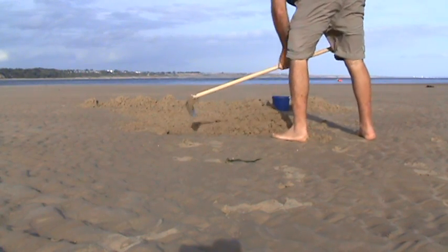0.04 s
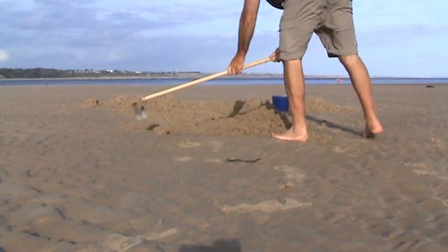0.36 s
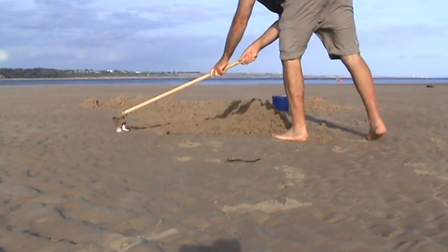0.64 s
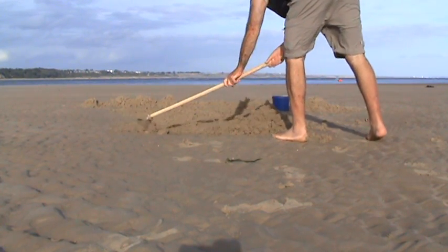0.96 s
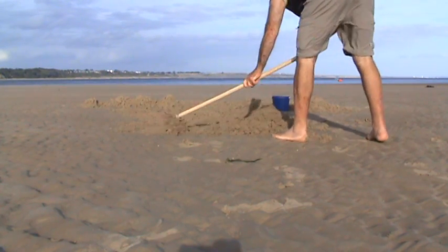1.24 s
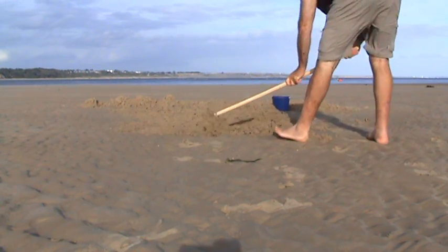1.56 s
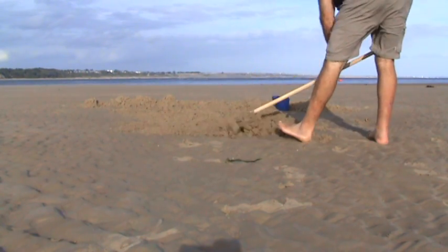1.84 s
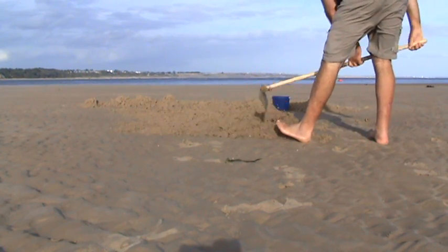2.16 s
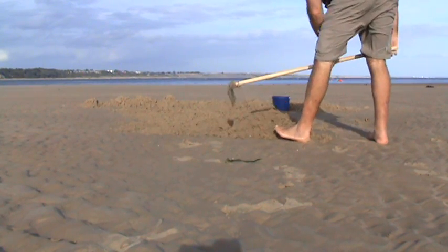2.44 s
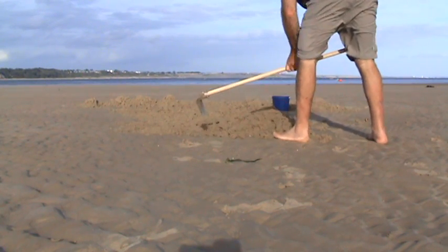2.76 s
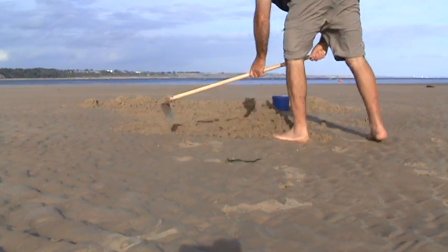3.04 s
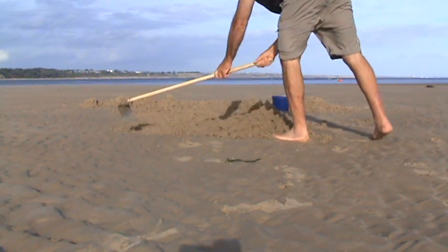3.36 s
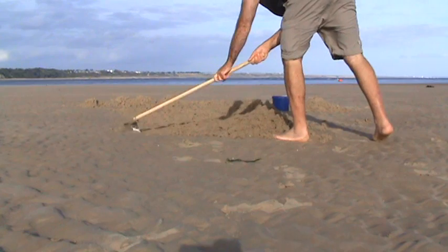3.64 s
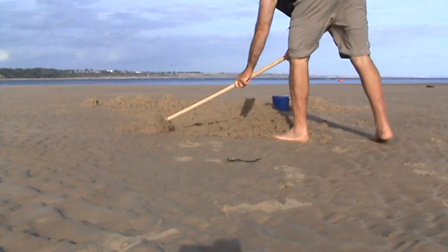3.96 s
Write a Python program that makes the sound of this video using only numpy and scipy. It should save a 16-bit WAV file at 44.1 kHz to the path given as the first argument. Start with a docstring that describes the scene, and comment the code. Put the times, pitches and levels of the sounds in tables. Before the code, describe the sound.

Wind rumbles and thumps on the microphone over two quieter rake strokes in sand.

```python
"""A rake is pulled twice through wet beach sand, a few metres away: its head lands with a scuff,
then the tines scrape through the grains, rasp where they bite and tick on bits of shell.
Gusty wind buffets the microphone's two ports, a lumpy rumble that turns to a rough flutter as it
stiffens; its eddies thump, spit and snap. A faint even hiss lies under it all."""
import sys
import numpy as np
from scipy import signal
from scipy.fft import rfft, irfft
from scipy.io import wavfile

SR = 44100
rng = np.random.default_rng(int(sys.argv[2]) if len(sys.argv) > 2 else 0)


def materialize(psi):
    """Save the field psi as 16-bit PCM at rate SR to the path in sys.argv[1].

    A 1-D psi becomes a single channel; in a 2-D psi each row is a channel.
    """
    bounded = np.clip(np.atleast_2d(psi).T, -1, 1)
    quanta = np.round(bounded * 32767).astype(np.int16)
    wavfile.write(sys.argv[1], SR, quanta)


N = 176400
TIME = np.arange(N) / SR
BINS = np.arange(N // 2 + 1) * SR / N


def from_db(db):
    """Decibels to gain."""
    return 10 ** (np.asarray(db) / 20)


def rms_one(x):
    """Scale to unit power."""
    return x / np.sqrt(np.mean(x ** 2) + 1e-20)


def at_hz(points, hz):
    """Read a table on a log-frequency axis."""
    f, v = np.transpose(points)
    return np.interp(np.log(np.maximum(hz, 1)), np.log(f), v)


def in_time(points, **ends):
    """Read an envelope at every sample."""
    return np.interp(TIME, *np.transpose(points), **ends)


def swell(s, length):
    """A smooth rise and fall centred on s; length is its width at half height."""
    return np.cos(np.pi / 2 * np.clip((TIME - s) / length, -1, 1)) ** 2


def eq_curve(spectrum):
    """An EQ of unit power, so only its shape counts; it rolls off below the first point."""
    return rms_one(from_db(at_hz(spectrum, BINS)) * np.minimum(BINS / spectrum[0][0], 1) ** 2)


def coloured(x, spectrum):
    """EQ a white signal, keeping its power."""
    return irfft(rfft(x) * eq_curve(spectrum), N)


def drift(rate_hz):
    """Smooth random modulation with spread 1."""
    noise = rfft(rng.standard_normal(N))
    return rms_one(irfft(noise * (BINS > 2) / (1 + (BINS / rate_hz) ** 2), N))


def cracks(per_s, spread_db):
    """Random tiny impulses of uneven size."""
    born = rng.random(N) < per_s / SR
    signs = rng.choice([-1, 1], N)
    return rms_one(born * signs * from_db(spread_db * np.minimum(rng.exponential(1, N), 5)))


def resonance(x, hz, width):
    """One resonance that keeps the power of a white signal."""
    return np.sqrt(SR / np.pi / width) * signal.lfilter(*signal.iirpeak(hz, hz / width, fs=SR), x + 1e-18)


def gliding_resonance(x, hz, width):
    """A resonance whose centre moves; it keeps the power of a white signal."""
    turn = np.exp(2j * np.pi * np.cumsum(hz) / SR)
    r = np.exp(-np.pi * width / SR)
    return np.real(turn * signal.lfilter([np.sqrt(2 * (1 - r * r))], [1, -r], x / turn + 1e-18))


def stereo(mid, side, pan_db):
    """Left and right from mid and side; a positive pan leans left."""
    return np.array([(mid + side) * from_db(pan_db / 2), (mid - side) * from_db(-pan_db / 2)])


# EQ of the noise bed: f/Hz, level/dB
HISS_EQ = [(500, 17.5), (2000, 8), (5000, 6), (8000, -0.5), (12000, -2), (15500, -7.5)]
def hiss(level_db=-67.5, side_db=-6):
    """A faint, steady bed of noise."""
    mid, side = from_db(level_db) * coloured(rng.standard_normal((2, N)), HISS_EQ)
    return stereo(mid, from_db(side_db) * side, 0)


# gust envelope: t/s, level/dB
GUST_ENVELOPE = [(0.0, -32), (0.06, -44), (0.14, -38), (0.29, -31.5), (0.46, -34), (0.58, -34.5),
                 (0.74, -31), (0.86, -35), (0.9, -35.5), (1.0, -36), (1.22, -43.5), (1.28, -37.5),
                 (1.52, -47.5), (1.66, -41), (1.72, -37.5), (1.79, -39.5), (1.89, -37.5), (1.95, -35),
                 (2.18, -39), (2.3, -34.5), (2.34, -38), (2.44, -32.5), (2.6, -30), (2.66, -38),
                 (2.78, -43), (2.88, -35.5), (2.93, -34), (2.96, -28), (3.2, -31.5), (3.52, -43.5),
                 (3.57, -36.5), (3.68, -28), (3.84, -30.5), (3.98, -29)]
# low rumble envelope: t/s, level/dB
RUMBLE_ENVELOPE = [(0.0, -24), (0.14, -17.5), (0.44, -17), (0.56, -21.5), (0.64, -20), (0.96, -18),
                   (1.02, -18.5), (1.16, -22), (1.22, -28), (1.27, -20), (1.34, -17.5), (1.38, -25),
                   (1.43, -20), (1.5, -32), (1.65, -19.5), (1.73, -13.5), (1.8, -19), (1.9, -19),
                   (2.14, -18), (2.32, -20), (2.42, -15), (2.6, -15.5), (2.68, -23.5), (2.72, -19.5),
                   (2.76, -20.5), (3.1, -19), (3.4, -20.5), (3.5, -23), (3.74, -14.5), (3.98, -14.5)]
# hard buffets: t/s, length/s, boost of the low body/dB, boost of the crackling edge/dB
BUFFET_HITS = [(0.105, 0.011, 9, 11.5), (0.141, 0.013, 9.5, 8), (0.176, 0.0074, 13, 9.5),
               (0.222, 0.011, 7.5, 0), (0.251, 0.022, 2, 5), (0.28, 0.022, 0.5, 2.5),
               (0.334, 0.011, -3, 11), (0.449, 0.012, 0, 7), (0.465, .007, -2, 5.5),
               (0.519, 0.0053, -5, 5.5), (0.611, 0.0086, 3, -4.5), (0.801, 0.0073, -0.5, -2),
               (0.861, 0.015, 6.5, 10), (0.948, 0.0039, 0.5, 6.5), (0.996, 0.0093, 9.5, 8.5),
               (1.027, .008, 7, 12.5), (1.077, 0.01, 10, 9.5), (1.178, 0.011, 9.5, 2.5),
               (1.262, 0.011, 6.5, 13), (1.291, 0.0068, 6, -0.5), (1.327, 0.016, 6.5, 3),
               (1.463, 0.0074, 15, 5.5), (1.52, .007, 14, -6), (1.592, .008, 8.5, 4),
               (1.693, 0.0065, 8, 14.5), (1.723, .012, 2, 12.5), (1.751, 0.0074, 6, 9.5),
               (1.795, 0.011, 6, 6), (1.819, .009, 7.5, 16.5), (1.875, 0.0092, 9.5, 6.5),
               (1.898, .008, -6.5, 13), (1.942, 0.013, 10, 8), (1.973, 0.0063, 0.5, 6),
               (2.065, 0.015, 6, 9.5), (2.122, 0.0055, -0.5, 7.5), (2.14, 0.012, 6, 7.5),
               (2.166, 0.0069, 10, 0), (2.222, 0.005, 7.5, 4.5), (2.289, 0.015, 8, 8),
               (2.375, 0.011, 11.5, 6.5), (2.413, 0.0096, 8.5, 3.5), (2.449, 0.015, 9, 11.5),
               (2.523, 0.026, 5, 5.5), (2.59, 0.016, 5.5, 3), (2.635, 0.006, 9, 9),
               (2.736, 0.0069, 17.5, 15.5), (2.844, 0.01, 6.5, 6), (2.904, 0.0057, 12, 0),
               (3.035, .01, 1, -1.5), (3.186, 0.0079, 3, 5.5), (3.237, 0.013, 7, 4.5), (3.437, 0.011, 6, 3),
               (3.555, 0.014, 6.5, 8.5), (3.64, 0.0048, 4, 6), (3.7, 0.011, 4, 2)]
def wind_force():
    """The wind's push in dB: gust and rumble about their means, and the buffets' body and edge."""
    gust, rumble = in_time(GUST_ENVELOPE), in_time(RUMBLE_ENVELOPE)
    body, edge = sum(np.outer(boosts_db, swell(s, length)) for s, length, *boosts_db in BUFFET_HITS)
    return gust - gust.mean(), rumble - rumble.mean(), body, edge


# base EQ of the wind: f/Hz, level/dB
RUSH_EQ = [(22, -11), (50, -1.5), (100, -1), (200, -7), (330, -13.5), (600, -27), (1200, -37.5),
           (2200, -46), (3300, -54.5), (3900, -64), (4700, -68), (6000, -85), (9000, -97.5)]
# how far a band rides the gusts: f/Hz, dB per dB of gust
GUST_DEPTH = [(100, 1.6), (300, 1.01), (1000, 0.79), (3000, 1.17), (5000, 2.5)]
# how much a band rides the rumble instead: f/Hz, share
RUMBLE_BLEND = [(90, 1.0), (180, 0.69), (360, 0), (720, 0)]
# how far a band rides a buffet: f/Hz, dB per dB of body, dB per dB of edge
BUFFET_DEPTH = [(91.4, 0.2, 0), (183, 0.78, 0), (360, 0.78, 0.043), (720, 0.59, 0.26), (1440, 0.2, 0.55),
                (2900, 0, 1.14), (5000, 0.31, 1.7)]
# flutter from fast turbulence: f/Hz, depth/dB
FLUTTER_DEPTH = [(60, -0.5), (300, 2.56), (1000, 2.5), (3000, 3.5), (5000, 7)]
def rush(gust, rumble, body, edge, level_db=-21):
    """Turbulent pressure on the ports: each octave of noise surges and flutters by its own amount."""
    eddies = drift(rate_hz=140) + 0.77 * drift(rate_hz=43)
    eddies = 2 * np.tanh(eddies / 2)  # soften the wildest swings
    white = rng.standard_normal((2, N))
    depths = np.array(BUFFET_DEPTH)
    octaves = 45 * 2 ** np.arange(8)
    spectrum = 0
    for hz in octaves:
        deep = np.clip(at_hz(RUMBLE_BLEND, hz), 0, 1)
        buffet_db = at_hz(depths[:, :2], hz) * body + at_hz(depths[:, ::2], hz) * edge
        force_db = deep * rumble + (1 - deep) * at_hz(GUST_DEPTH, hz) * gust + buffet_db
        flutter = rms_one(from_db(at_hz(FLUTTER_DEPTH, hz) * eddies))
        band = np.interp(BINS, octaves, octaves == hz)
        spectrum = spectrum + rfft(white * from_db(force_db) * flutter) * band
    return from_db(level_db) * irfft(spectrum * eq_curve(RUSH_EQ), N)


# EQ of the wind's crackle: f/Hz, level/dB
SPIT_EQ = [(200, 9), (600, 16.5), (1500, -2), (3500, -11.5), (4600, -25), (6500, -46), (10000, -60.5)]
def spits(gust, edge, level_db=-45.5, gust_depth=1.18):
    """Eddies break on the ports and spit, louder in gusts and buffets."""
    crackle = np.array([cracks(per_s=170, spread_db=2.5) for _ in range(2)])
    return coloured(crackle * from_db(level_db + gust_depth * gust + edge), SPIT_EQ)


# snap cues: t/s, level/dB before gain and EQ
SNAP_HITS = [(0.141, -34.5), (0.178, -39), (0.292, -22.5), (0.334, -26.5), (2.444, -28), (2.447, -24.5),
             (2.454, -29), (2.462, -28), (2.51, -28), (2.523, -30.5), (2.532, -26.5), (2.591, -33.5),
             (2.733, -29), (2.736, -38.5), (2.997, -36.5)]
# EQ of a snap: f/Hz, level/dB
SNAP_EQ = [(400, 15), (1500, -4), (3500, 0), (5500, -13), (7000, -28), (10000, -52)]
def snaps(gain_db=6.5):
    """Single sharp pressure kicks from the hardest eddies, breaking right on a port."""
    kicks = np.zeros((2, N))
    for s, db in SNAP_HITS:
        kicks[:, int(s * SR)] = from_db(gain_db + db) * rng.choice([-1, 1], 2)
    return coloured(kicks, SNAP_EQ)


# low thump cues: t/s, level/dB
THUMP_HITS = [(0.149, -11), (0.224, -13), (0.432, -13), (0.495, -11.5), (0.621, -11), (0.986, -10),
              (1.183, -10), (1.266, -15), (1.464, -19), (1.692, -9), (1.869, -11.5), (1.947, -9.5),
              (2.077, -15.5), (2.164, -13.5), (2.415, -9), (2.905, -13.5), (3.223, -13), (3.302, -16.5),
              (3.445, -10)]
def thumps(hz=90.5, length_s=0.011):
    """A large eddy pushes and pulls once on the ports."""
    phases = 2 * np.pi * rng.random((len(THUMP_HITS), 2, 1))
    return sum(from_db(db) * swell(s, length_s) * np.sin(2 * np.pi * hz * (TIME - s) + phase)
               for (s, db), phase in zip(THUMP_HITS, phases))


# colour of the ports' small cavity: f/Hz, gain/dB
CAVITY_EQ = [(2800, 0), (3300, -1), (3700, 1), (4200, -0.5), (4700, -4), (6000, -5)]
# stereo width of the wind: f/Hz, side over mid/dB
PORT_WIDTH = [(35, -8.5), (85, -6.5), (170, 1), (350, 8), (700, 8.5), (1400, 6.5), (2800, 2.5), (5000, 0.5)]
# part of the side a quarter cycle ahead of the mid: f/Hz, share (negative lags)
SIDE_LEAD = [(45, -1.1), (100, -0.43), (200, 1), (400, 0.31), (800, 0.4), (1500, .55), (3000, 0.86)]
# pan of the wind: f/Hz, left over right/dB
PORT_PAN = [(35, 0.7), (170, -2.15), (600, 0.5), (1400, 0), (3000, -1.5), (5000, -2)]
def ports(pair):
    """Two unrelated pressures become the mid and side of the microphone's close ports."""
    mid, unrelated = rfft(pair) * from_db(at_hz(CAVITY_EQ, BINS))
    lead = np.clip(at_hz(SIDE_LEAD, BINS), -.95, .95)
    side = from_db(at_hz(PORT_WIDTH, BINS)) * (1j * lead * mid + np.sqrt(1 - lead ** 2) * unrelated)
    return irfft(stereo(mid, side, at_hz(PORT_PAN, BINS)), N)


def wind():
    """All the wind layers, heard through the ports they strike."""
    gust, rumble, body, edge = wind_force()
    return ports(rush(gust, rumble, body, edge) + spits(gust, edge) + snaps() + thumps())


def grit():
    """Sand grains cracking past each other."""
    return cracks(per_s=8000, spread_db=1.9)


def stick_slip(depth_db=1.5):
    """The level judders as the tines stick and slip."""
    return from_db(depth_db * drift(rate_hz=45))


# scuff cues: t/s, length/s, level/dB
SCUFF_HITS = [(0.25, 0.082, -68), (0.568, 0.12, -70.5), (0.613, 0.025, -57.5), (2.247, 0.028, -67),
              (3.302, .14, -72.5), (3.589, 0.035, -62), (3.603, 0.014, -60), (3.804, .03, -60),
              (3.848, .04, -59)]
# EQ of spraying sand: f/Hz, level/dB
SCUFF_EQ = [(1500, -10.5), (4500, 6.5), (9000, 3), (12000, -0.5), (15500, -12.5)]
def scuffs():
    """Brief bright sprays of grains, as when the rake head lands."""
    envelope = sum(from_db(db) * swell(s, length) for s, length, db in SCUFF_HITS)
    return coloured(grit() * envelope, SCUFF_EQ)


# tick cues: t/s, burst level/dB, ring f/Hz, ring width/Hz
TICK_HITS = [(1.065, -45, 6200, 900), (1.097, -45, 5900, 1000), (1.127, -37.5, 4850, 700),
             (1.131, -43, 6200, 1400), (1.397, -42, 5300, 1200), (1.405, -43, 6100, 1500),
             (1.433, -52, 7000, 900), (1.463, -46, 7200, 1500), (1.655, -47, 8500, 2000),
             (1.727, -50, 8100, 200), (1.728, -54, 11300, 120), (3.718, -47.5, 4500, 2000),
             (3.774, -46, 6000, 1500), (3.799, -49.5, 8500, 3000), (3.837, -40, 4100, 900),
             (3.845, -43, 5500, 1500), (3.868, -44, 6200, 2000), (3.921, -49, 6500, 1500)]
# EQ of a tick's crunch: f/Hz, level/dB
CRUNCH_EQ = [(1500, 2.5), (2600, 8.5), (4000, -6), (5500, -0.5), (8000, -12), (11000, -23), (15500, -29)]
def ticks(decay_s=0.0018, crunch_db=-2.5, ring_db=-2):
    """A tine catches shell or grit: a tiny crunch with a short ring."""
    crunch, rings = 0, 0
    for s, db, hz, width in TICK_HITS:
        envelope = (TIME >= s) * np.exp(-np.clip((TIME - s) / decay_s, 0, 20))
        burst = rng.standard_normal(N) * from_db(db) * envelope
        crunch = crunch + burst
        rings = rings + resonance(burst, hz, width)
    return from_db(crunch_db) * coloured(crunch, CRUNCH_EQ) + from_db(ring_db) * rings


# rasp cues: t/s, length/s, drive level/dB, f/Hz, width/Hz, glide/(Hz per s)
RASP_BITES = [(0.87, 0.1, -62, 6060, 800, 0), (0.83, 0.22, -65, 3420, 160, -1100),
              (1.032, 0.05, -62, 3150, 150, -1500), (1.07, 0.19, -62.5, 6000, 700, 0),
              (1.442, 0.15, -61, 7450, 1300, 0), (1.676, 0.06, -62, 3680, 700, -6000),
              (3.823, 0.36, -66, 6400, 800, 0), (3.84, 0.14, -53, 3300, 1100, 0)]
# EQ of the grains that drive a rasp: f/Hz, level/dB
RASP_DRIVE_EQ = [(1500, 10), (9000, -1), (15500, -9.5)]
def rasps():
    """Where the tines bite, the grains drive a resonance, which may sink as they drag on."""
    grains = coloured(grit(), RASP_DRIVE_EQ) * stick_slip()
    return sum(gliding_resonance(grains * from_db(db) * swell(s, length), hz + glide * (TIME - s), width)
               for s, length, db, hz, width, glide in RASP_BITES)


# envelopes of the two pulls, one list each: t/s, level/dB before gain, treble shelf/dB
PULL_ENVELOPES = [
    [(0.69, -69, 6), (0.73, -60, -4), (0.87, -61.5, 3), (0.93, -59, 1), (1.07, -55, -0.5), (1.28, -60, 0),
     (1.44, -58.5, 1), (1.59, -57, -2.5), (1.66, -58, 1), (1.83, -59.5, 3.5), (1.95, -70, 9),
     (2.06, -74, 11.5), (2.12, -77.5, 11), (2.33, -77, 4)],
    [(3.62, -80, 1), (3.68, -61.5, 4), (3.715, -65, 4), (3.732, -66, -6), (3.76, -57, -3), (3.8, -53, -6),
     (3.85, -57.5, -8), (3.89, -61, -6), (4.0, -56, -1)],
]
# EQ of scraping sand: f/Hz, level/dB
SAND_EQ = [(700, -3), (1500, 5), (2800, 6.5), (4300, 4.5), (6100, 1), (7600, -2.5), (8400, -2.5),
           (11000, -8.5), (15500, -19)]
def scrape(gain_db=3, shelf_hz=6900):
    """The tines crush grains as they stick and slip through the sand."""
    pressure = sum(from_db(in_time(np.array(pull)[:, :2], left=-140, right=-140))
                   for pull in PULL_ENVELOPES)
    shelf_db = in_time(np.vstack(PULL_ENVELOPES)[:, ::2])
    sand = coloured(from_db(gain_db) * pressure * stick_slip() * grit(), SAND_EQ)
    treble = irfft(rfft(sand) * (1 - 1 / (1 + (BINS / shelf_hz) ** 6)), N)
    return sand + (from_db(shelf_db) - 1) * treble


def scene():
    """The rake nearly straight ahead, the wind on the microphone itself, the hiss beneath."""
    mid = scrape() + rasps() + scuffs() + ticks()
    side = from_db(-17.5) * scrape()  # fresh grains give the scrape a little width
    return stereo(mid, side, pan_db=-0.8) + wind() + hiss()


def record(dry, fade_in_s=0.008, cutoff_hz=15750):
    """Soft-clip the highest peaks, fade in and cut the top."""
    rounded = dry / (1 + dry ** 8) ** (1 / 8)
    faded = rounded * np.minimum(TIME / fade_in_s, 1)
    return signal.sosfilt(signal.ellip(10, .1, 80, cutoff_hz, fs=SR, output="sos"), faded)


dry = scene()
out = record(dry)
materialize(out)
```